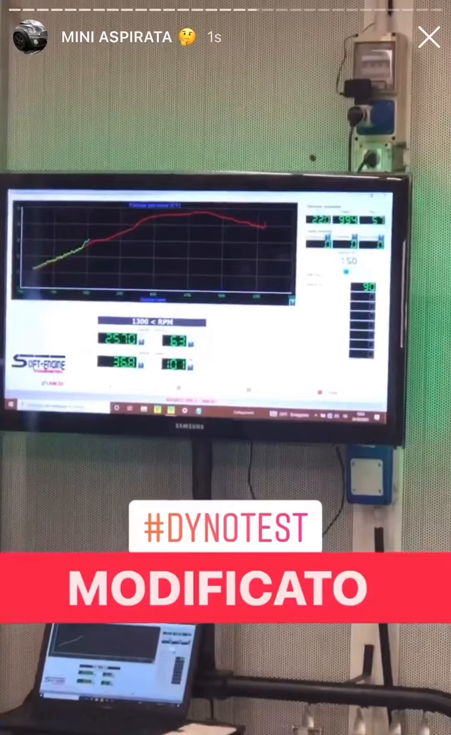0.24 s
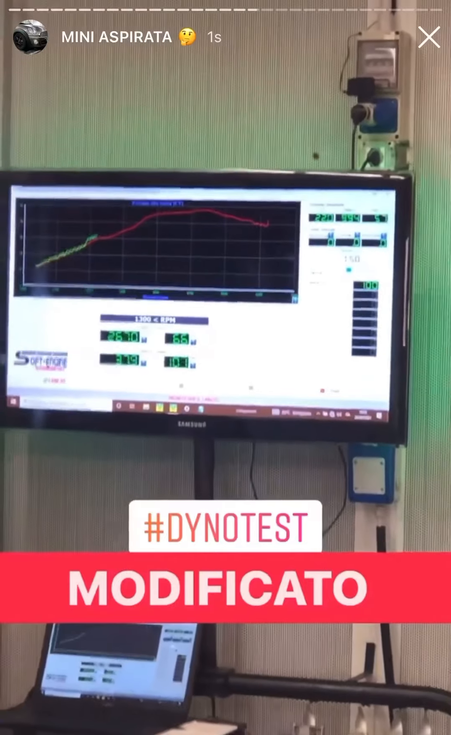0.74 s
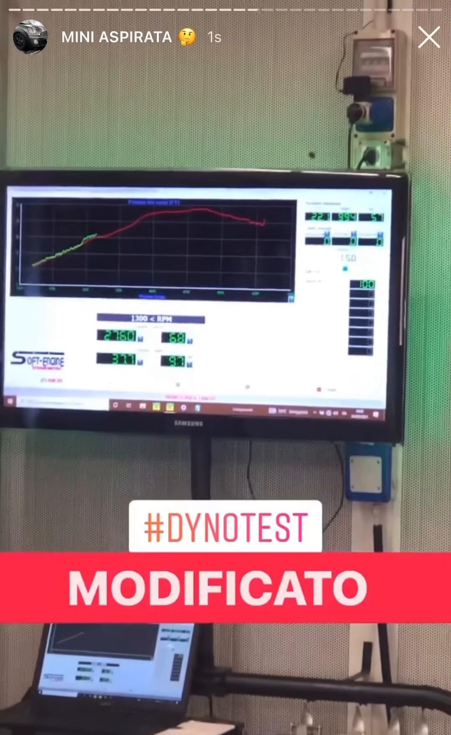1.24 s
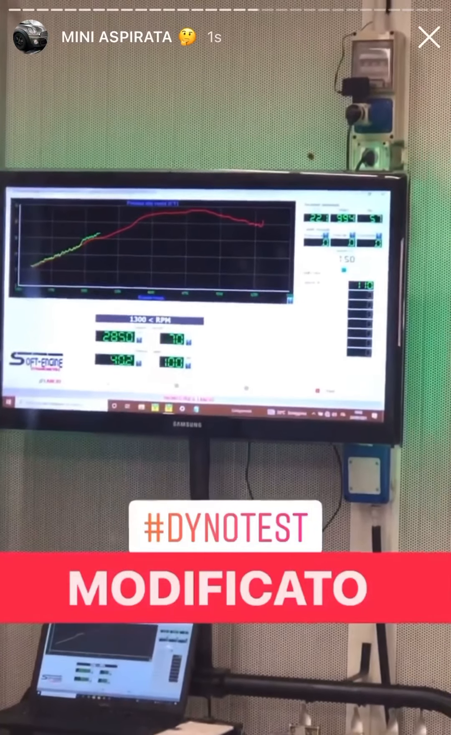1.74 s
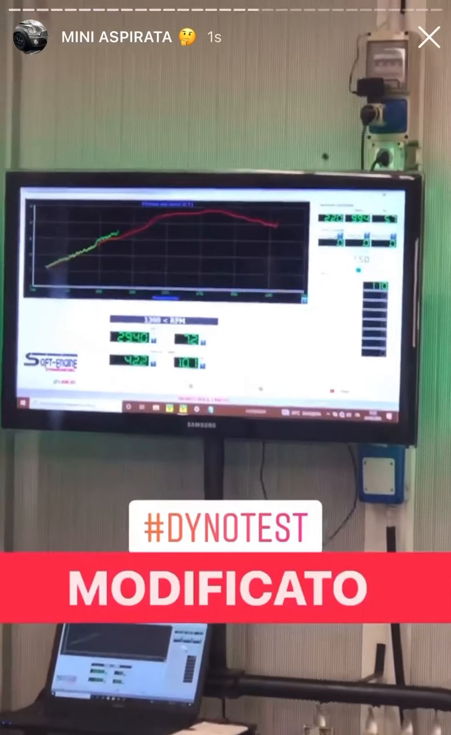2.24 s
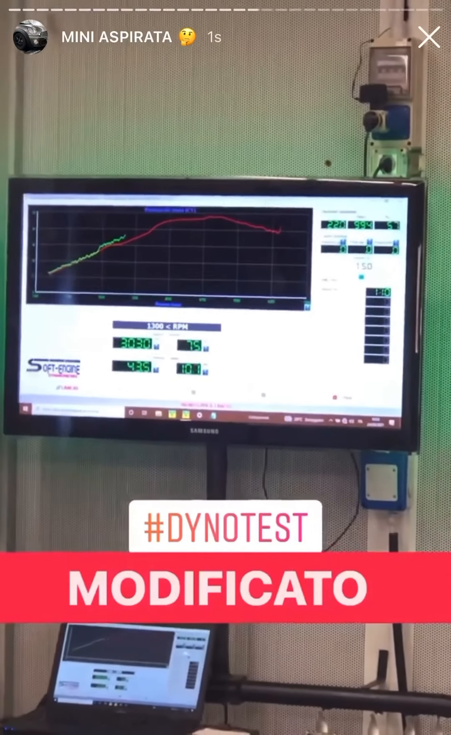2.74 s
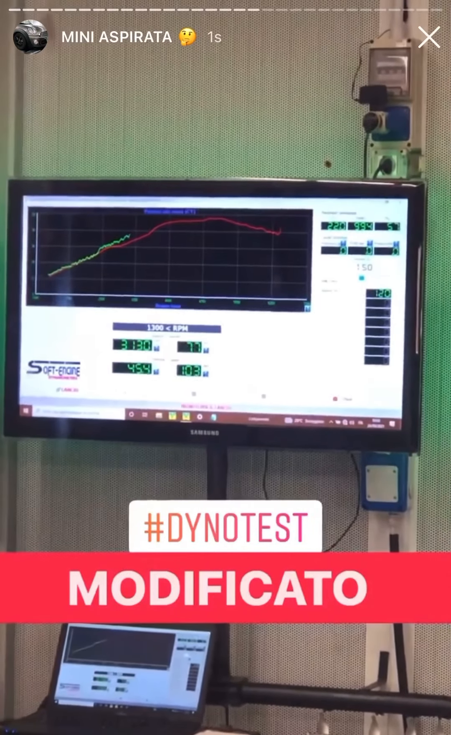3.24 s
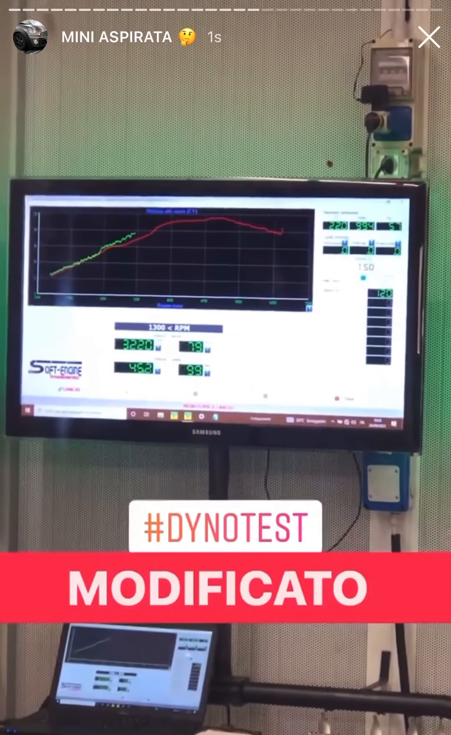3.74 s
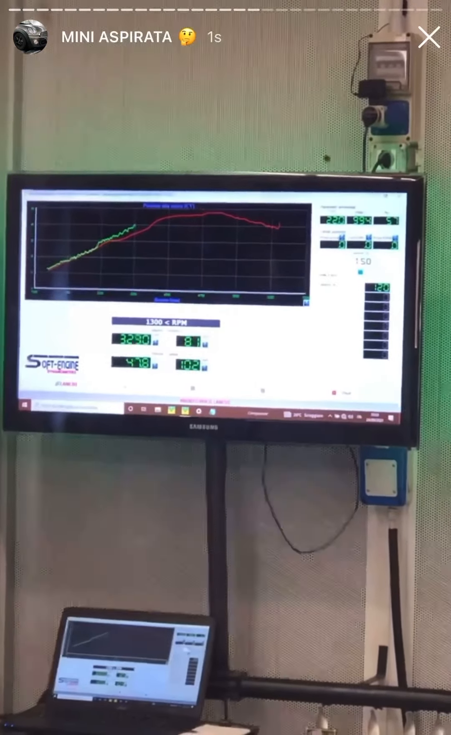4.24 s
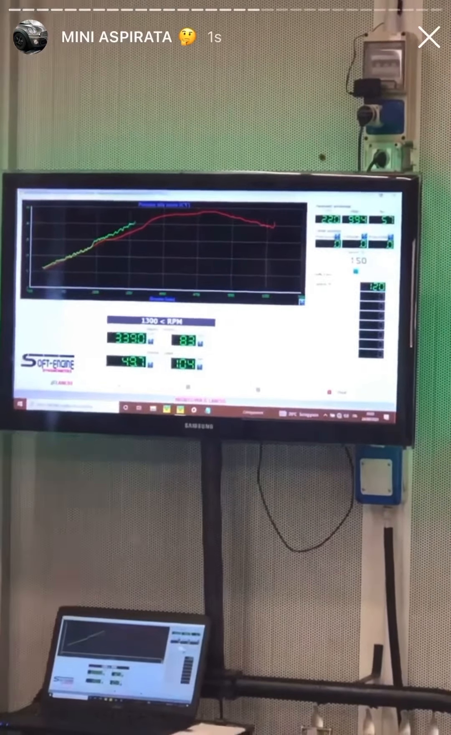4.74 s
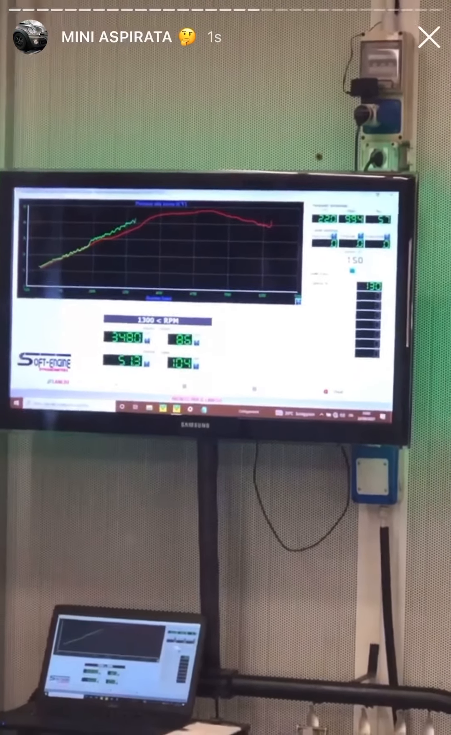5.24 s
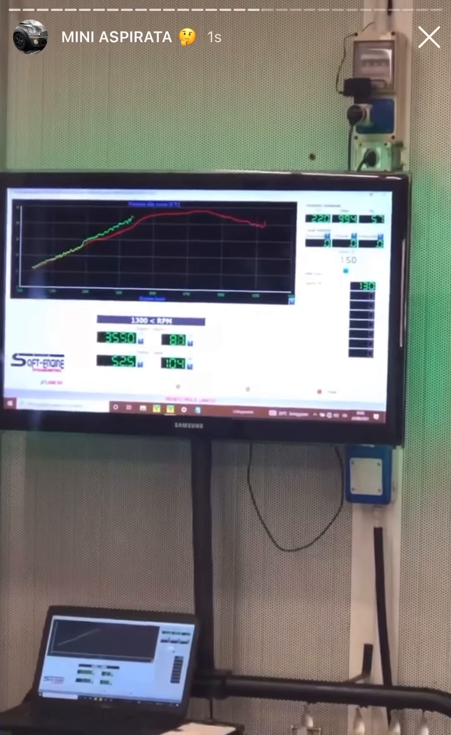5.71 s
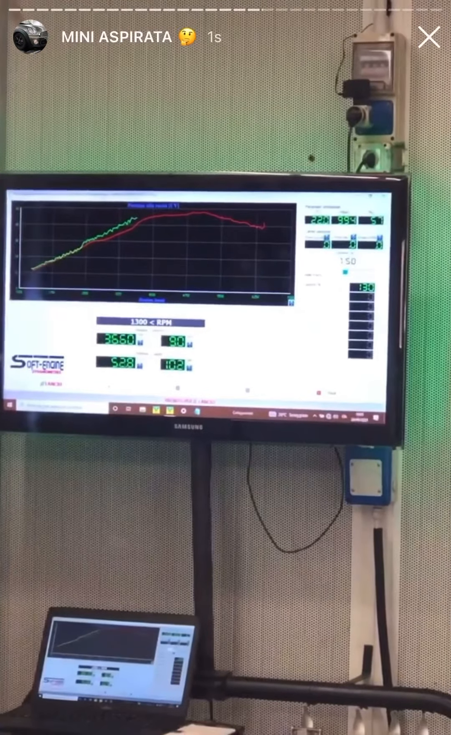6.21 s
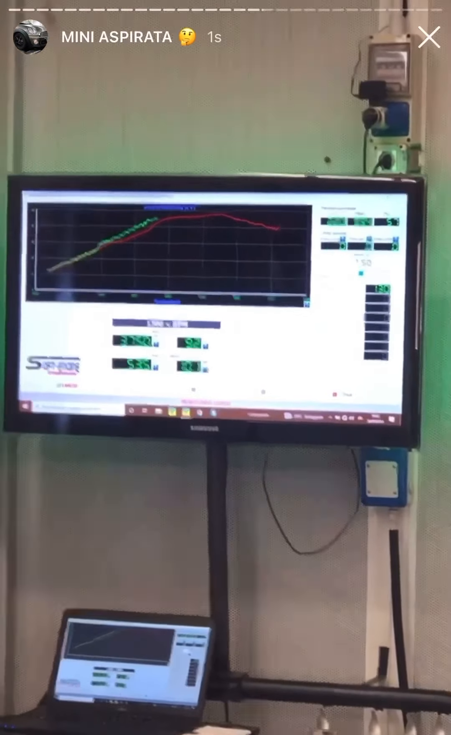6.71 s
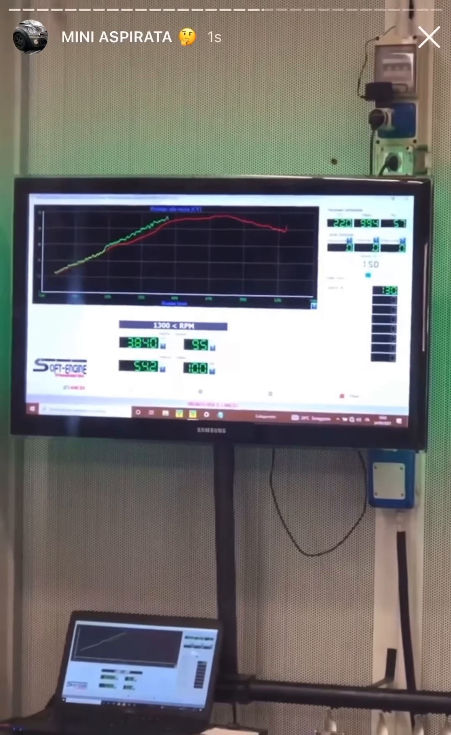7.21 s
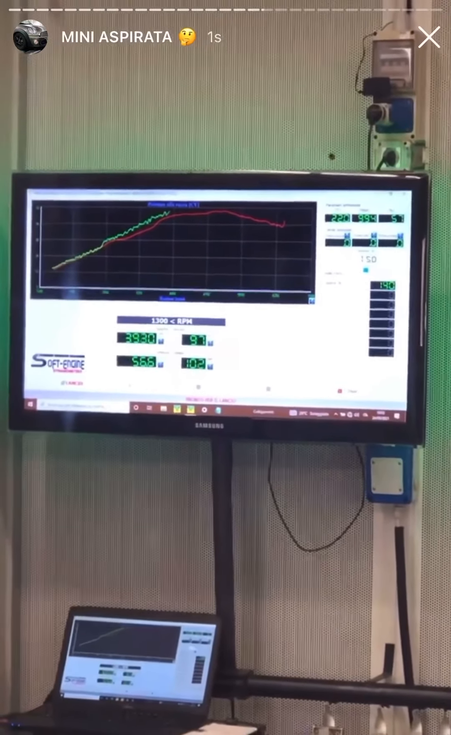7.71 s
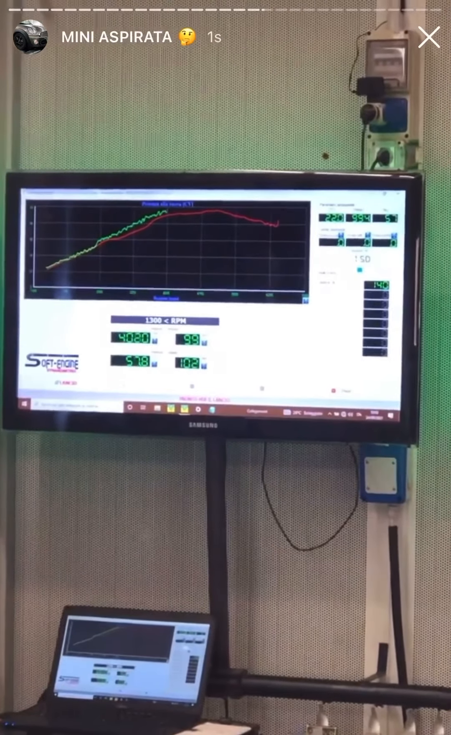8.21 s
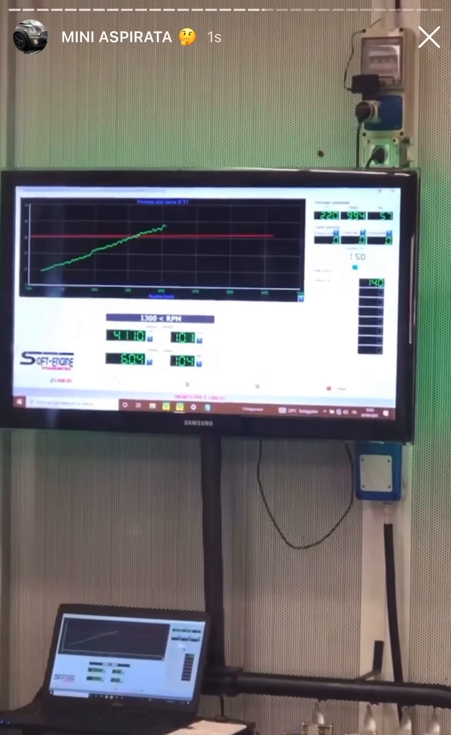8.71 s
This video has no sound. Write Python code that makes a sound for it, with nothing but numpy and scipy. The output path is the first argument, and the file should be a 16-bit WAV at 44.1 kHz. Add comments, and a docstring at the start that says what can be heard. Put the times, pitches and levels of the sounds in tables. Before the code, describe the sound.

Heard from the next room, a four-cylinder petrol engine pulls steadily upward at full throttle on dynamometer rollers. Its deep drone swells and dips through room and pipe resonances, over roller hum, faint gear whine, valve clatter and rushing air. Just before the middle the sound drops to silence for a quarter second, clicking at both edges, then resumes. Late on, the casing rings metallic and the treble grows.

```python
"""A four-cylinder petrol engine climbs at full throttle on a roller dynamometer, heard from the next room.
From the start its firing orders (sines at multiples of the firing rate) slide through fixed resonances,
over roller hum, gear whines, clatter, roaring and buffeting noise and a faint high line near 10.1 kHz.
Near 4 s the sound cuts out dead for a quarter of a second, with a click at each edge.
It returns and climbs on, and in the last seconds the engine casing rings strongly."""
import sys
import numpy as np
from scipy import signal
from scipy.fft import rfft, irfft
from scipy.io import wavfile
from scipy.ndimage import uniform_filter1d

SR = 44100
rng = np.random.default_rng(int(sys.argv[2]) if len(sys.argv) > 2 else 0)


def to_wav(s):
    """Save 16-bit WAV."""
    ch = np.atleast_2d(s).T  # columns
    pcm = np.round(np.clip(ch, -1, 1) * 32767)  # PCM
    wavfile.write(sys.argv[1], SR, pcm.astype(np.int16))


N = 395136  # length in samples
STEP = 256  # samples between control values

# How fast the engine fires. Each row: time in seconds, firings per second in Hz.
FIRING_RATE = [(0.0, 86.14), (0.5, 89.13), (1.0, 92.13), (1.5, 95.35), (2.0, 98.43), (2.5, 101.56),
               (3.0, 104.65), (3.5, 107.69), (3.88, 110.02), (4.15, 111.05), (4.6, 113.72), (5.2, 117.47),
               (5.8, 121.15), (6.4, 124.79), (7.0, 128.31), (7.6, 131.9), (8.2, 135.49), (8.6, 137.75),
               (8.96, 139.85)]


def amp(db):
    """Turn decibels into gain."""
    return 10 ** (np.asarray(db) / 20)


def curve(table, t, axis=1):
    """Read one column of a table, joined by straight lines along its first column."""
    rows = np.array(table)
    return np.interp(t, rows[:, 0], rows[:, axis])


def spread(points, hz):
    """Read a spectrum joined by straight lines on a log-frequency axis."""
    f, value = np.transpose(points)
    return np.interp(np.log(hz + 1), np.log(f + 1), value)


def peaks_db(peaks, hz):
    """Add up bell-like peaks and dips in dB, each with its own frequency and width."""
    return sum(db / (1 + (2 * (hz - f) / width) ** 2) for f, width, db in peaks)


def resonance(hz, f, width, db):
    """Complex response of one resonance, which reaches its dB at its own frequency f."""
    return amp(db) * width / 2 / (width / 2 + 1j * (hz - f))


def drift(t, fastest_hz):
    """Slow random wandering of rms 1, made of 16 sines with random starts."""
    hz = np.geomspace(fastest_hz / 20, fastest_hz, 16)
    start = rng.random(16)
    x = (np.sin(2 * np.pi * (np.outer(t, hz) + start)) / np.sqrt(hz)).sum(1)
    return x / x.std()


def tone(turns, height):
    """A sine following the given turns; its complex height (rms and phase) comes at control rate."""
    at = np.arange(len(turns)) * (N / len(turns) / STEP)
    steps = np.arange(len(height))
    smooth = np.interp(at, steps, height.real) + 1j * np.interp(at, steps, height.imag)
    return np.sqrt(2) * (smooth * np.exp(2j * np.pi * turns)).real


def boom(hz):
    """Gain of the standing waves between tailpipe and walls; their swings add or cancel."""
    # Each row: frequency in Hz, width in Hz, level in dB, sign of the swing.
    standing_waves = [(48, 5.7, -10, 1), (107.66, 16.3, -20, 1), (129.4, 12, -19, -1),
                      (144.2, 5.43, -14, -1), (183.4, 7, -6, 1), (199.4, 28.0, -20.5, -1),
                      (254.5, 13.7, -5.5, 1), (268.4, 32.4, -9.5, -1), (279.74, 5.5, -12, 1),
                      (314.2, 42.2, -24, -1), (322.4, 3.1, -27, 1), (327, 30, -24, 1),
                      (384.1, 17.5, -23.5, 1), (398.8, 6.4, -30.5, 1), (418, 30, -29, -1),
                      (444, 9.9, -33.5, -1), (481.2, 21, -30, -1), (507.7, 15, -30.5, -1),
                      (539, 3.9, -31.5, 1), (571, 9.3, -27, 1), (668, 42, -30.5, -1), (700, 1.0, -39.5, 1),
                      (945, 15, -25.5, 1), (1350, 540, -34.5, -1)]
    return abs(sum(np.sign(swing) * resonance(hz, f, width, db) for f, width, db, swing in standing_waves))


def swell_db(order, t):
    """Bell-shaped swells and dips of one firing order as time passes."""
    # Each row: multiple of the firing rate, centre in seconds, spread in seconds, lift in dB.
    passing_swells = [(5.75, 1, .8, -4.5), (6, 5.3, .4, 5.5), (3, 3.6, 0.32, 5), (6.5, 6, 1.1, 4),
                      (7, 5, .6, 5), (7.75, 4.6, .4, 6.5), (6.75, 7.3, .5, 5), (.5, .4, 0.36, 2),
                      (1.25, 4.3, 0.37, 6.5), (1.5, .7, .3, 5), (1.75, 3.2, .5, 4.5), (2, 0.23, 0.19, -5),
                      (2, 2.1, 0.35, -2.5), (2, 4.4, .9, 4.5), (2.25, 5.8, .4, 6), (3, 3, 0.22, -8),
                      (3, 5.8, .35, 2.5), (3.25, 8.5, 0.36, -7), (4, 4.5, 0.22, 3), (5, 6, .3, 6),
                      (6, 1.6, .6, 7), (7.25, 6.2, .8, 8), (8, 3.2, 0.55, 8.5), (8.25, 5.2, .5, 7),
                      (1.25, 0.21, .4, 6.5), (1.25, 1.6, 0.57, -8.5), (1.5, 7.2, .4, 4.5),
                      (2.25, 0.32, 0.63, 7.5), (2.25, 6.9, 0.3, -2), (2.5, 0.73, 0.35, -15.5),
                      (2.5, 2.22, .4, 7), (2.5, 3.6, 0.28, -7.5), (2.75, .2, 0.29, -2),
                      (2.75, 2.7, 0.62, -2.5), (2.75, 8.8, .3, 10), (3, 2.9, 0.69, 2),
                      (3.25, 0.47, 0.44, -9.5), (3.25, 5.4, .7, 8), (3.5, 1, 0.35, 11),
                      (3.5, 8.3, 0.75, 4.5), (4, .3, 0.42, -4.5), (4, 1.6, 0.33, 5.5),
                      (4, 8.25, 0.1, -11.5), (4.25, 1.2, 0.44, 2), (4.5, 1, .6, -4), (4.75, 0.11, .3, -8),
                      (4.75, 1.1, 0.32, 3.5), (4.75, 6.2, .4, 5.5), (5, 2.7, 0.33, -5.5), (5, 4.8, .5, 4.5),
                      (5.25, .1, 0.33, -10.5), (5.25, 2, .6, 5.5), (5.5, .2, .4, 2.5), (5.75, 4.3, .7, 4),
                      (6, 2.5, 1.1, -2.5), (7, 7.5, 0.54, 9.5), (7.5, 6.1, 0.86, 6), (8, 8, 0.83, 11.5),
                      (9, 3.2, .4, 8)]
    return sum(db * np.exp(-.5 * ((t - centre) / span) ** 2)
               for k, centre, span, db in passing_swells if round(4 * k) == round(4 * order))


def engine(t, turns):
    """Firing orders a quarter apart; the strong whole ones line up into pulses, and all cross the booms."""
    # The clear orders before swells and booms.
    # Each row: multiple of the firing rate, dB in mid climb, dB gained a second.
    clear_orders = [(0.5, -14, 0.5), (0.75, -7, 0.5), (1.0, 5.5, -0.02), (1.25, -18, 0.3),
                    (1.5, -25.5, -1.5), (1.75, -28.5, 2.9), (2.0, -15, 1.5), (2.25, -35.5, 4.5),
                    (2.5, -18.5, 1.77), (2.75, -23, 0.26), (3.0, -10.5, 1.36), (3.25, -19.5, 0),
                    (3.5, -20, 1.46), (3.75, -22, 2.1), (4.0, -7.5, 0.84), (4.25, -14.5, -0.14),
                    (4.5, -15, 0.9), (4.75, -15.5, -1.4), (5.0, -12.5, -1.1), (5.25, -19.5, -2.4),
                    (5.5, -20, -0.2), (5.75, -16.5, -1), (6.0, -25.5, 0.5), (6.25, -20, -2),
                    (6.5, -23.5, -1.5), (6.75, -29, -2.8), (7.0, -21.5, -1)]
    # The fainter orders, joined by lines between the rows and before the lifts below.
    # Each row: multiple of the firing rate, dB in mid climb, dB gained a second.
    faint_orders = [(.25, -17, 3), (7.25, -26.5, -1.1), (8.25, -28.5, -0.7), (11, -44.5, -2.3)]
    mid_s, top_order = 4.5, 11  # middle of the climb in seconds, highest multiple
    whole_db, half_db = 1.5, -1  # lift of faint whole and half multiples
    waver_db, slip = 3.0, .42  # wandering of the faint orders: level in dB, phase in radians at order 1
    turns = turns[::8]  # all orders lie low: a coarse time grid is enough
    rate = curve(FIRING_RATE, t)
    out = 0
    for multiple, db, rise_db in clear_orders:
        order = round(4 * multiple) / 4
        # orders from unequal cylinders waver in level and keep no common phase
        loose = order % 1 > 0
        waver = amp(loose * 1.3 * drift(t, 4))
        phase = .08j * order * drift(t, 6.6) + loose * 2j * np.pi * rng.random()
        level = amp(db + rise_db * (t - mid_s) + swell_db(order, t))
        out += tone(order * turns, level * boom(order * rate) * waver * np.exp(phase))
    quarters = np.arange(1, 4 * top_order + 1) / 4
    for order in np.setdiff1d(quarters, [round(4 * k) / 4 for k, *_ in clear_orders]):
        db = curve(faint_orders, order) + curve(faint_orders, order, axis=2) * (t - mid_s)
        db = db + whole_db * (order % 1 == 0) + half_db * (order % 1 == .5) + swell_db(order, t)
        waver = amp(waver_db * drift(t, 4.7))
        phase = 1j * slip * np.sqrt(order) * drift(t, 6) + 2j * np.pi * rng.random()
        out += tone(order * turns, amp(db) * boom(order * rate) * waver * np.exp(phase))
    return signal.resample_poly(out, 8, 1, window=("kaiser", 14))[:N]


def casing_db(hz):
    """Lift in dB given by the ways the engine casing vibrates."""
    # Each row: frequency in Hz, width in Hz, lift in dB.
    casing_modes = [(1550, 80, 1), (2250, 50, 2), (2725, 40, 13), (3030, 35, 6), (3585, 45, 7)]
    return peaks_db(casing_modes, hz)


def ringing(t):
    """How fully the casing rings, 0-1: faint at first, then it takes off at high speed."""
    takeoff_hz, span_hz, idle = 130.5, 1.5, .2  # firing rate at take-off, its softness, share below it
    return idle + (1 - idle) / (1 + np.exp((takeoff_hz - curve(FIRING_RATE, t)) / span_hz))


def driveline(t, turns):
    """Roller hum, shaft lines and gear whines, all geared to the engine; high lines slip most in phase."""
    # The roller hum swells and fades. Each row: time in seconds, level in dB rms.
    roller_hum = [(0.1, -36.5), (0.8, -21.5), (1.65, -18), (2.25, -35.5), (2.6, -25), (3.1, -15),
                  (3.7, -19.5), (4.7, -28.5), (5.2, -24.5), (5.9, -25.5), (6.4, -44.5), (7.1, -25.5),
                  (7.6, -23), (8.3, -32.5), (8.9, -23)]
    # Wheels, shafts and gear teeth, before waver and casing lift.
    # Each row: multiple of the firing rate, dB rms at the end, dB gained a second.
    shaft_lines = [(.225, -31, 1), (.89, -42, 0), (1.125, -43, -1), (6.6, -54, 1), (13.2, -66, .5),
                   (15.5, -68, .3), (19.5, -73, 1), (19.9, -72, 1), (20.4, -72, 1), (22.85, -73, 1),
                   (23.9, -72, .5), (25.95, -69, 1.5), (26.45, -73, .5)]
    roller_ratio = .337  # roller turns per firing
    out = tone(roller_ratio * turns, amp(curve(roller_hum, t)) + 0j)
    for multiple, db, rise_db in shaft_lines:
        waver = amp(2.2 * drift(t, 4.5))
        slip = np.exp(.4j * np.sqrt(multiple + 4) * drift(t, 8))
        casing_lift = ringing(t) * casing_db(multiple * curve(FIRING_RATE, t))
        level = amp(db + rise_db * (t - t[-1]) + casing_lift)
        out += tone(multiple * turns, level * waver * slip)
    return out


def treble_db(t):
    """Treble lift in dB, which grows steadily through the climb."""
    start_db, rise_db_per_s = -3, .6539
    return start_db + rise_db_per_s * t


def clatter(turns):
    """Valve-train taps: a random pattern returns every four firings, slowly renewed, smeared by the room."""
    # Colour of the taps, relative. Each row: frequency in Hz, level in dB per Hz.
    tap_colour = [(600, -36), (900, 0), (1400, 2), (1900, -7.5), (2500, -17), (3400, -12.5), (4400, -20.5),
                  (5000, -32.5), (7000, -48)]
    level_db = -49  # rms before the treble lift
    even_room = .6  # how far the room's peaks are evened out, 0-1
    t = np.arange(N) / SR
    patterns = rng.standard_normal((15, 512))
    place = (turns / 4 % 1 * 512).astype(int)
    # fade from each pattern to the next at constant power
    age = np.linspace(0, 13.999, N)
    old, fade = age.astype(int), np.pi / 2 * (age % 1)
    taps = np.cos(fade) * patterns[old, place] + np.sin(fade) * patterns[old + 1, place]
    # the room's echo is noise dying by 60 dB in 0.1 s
    echo_t = np.arange(SR // 4) / SR
    echo = rng.standard_normal(SR // 4) * amp(-60 * echo_t / .1)
    hz, room = np.fft.rfftfreq(N, 1 / SR), rfft(echo, N)
    heard = rfft(taps) * room / abs(room) ** even_room * amp(spread(tap_colour, hz))
    plain, rung = irfft(heard, N), irfft(heard * amp(casing_db(hz)), N)
    x = (1 - ringing(t)) * plain + ringing(t) * rung
    return x / x.std() * amp(level_db + treble_db(t))


def pipe(hz):
    """Complex response of exhaust pipe and workshop; neighbouring resonances swing in opposite sign."""
    # Each row: frequency in Hz, width in Hz, level in dB.
    pipe_modes = [(45, 9.2, -12.5), (115.4, 20.9, -13.5), (187.6, 16.1, -8), (257, 19.8, -5.5),
                  (337, 39, -14.5), (381, 21, -13.5), (517, 112, -13), (539, 15.1, -11), (643, 64, -19.5),
                  (883, 29.5, -10), (924, 125, -16), (1280, 550, -27.5)]
    return sum((-1) ** k * resonance(hz, *mode) for k, mode in enumerate(pipe_modes))


def roar(turns):
    """Noise of intake, tyres, fans and buffeting air, partly ringing the pipe and throbbing with the firings."""
    # Basic colour, relative. Each row: frequency in Hz, level in dB per Hz.
    roar_colour = [(4, 0), (9, -3), (13, 4.5), (16, -3), (21, -13), (38, -12), (80, -23.5), (200, -27.5),
                   (350, -34.5), (500, -35), (780, -37.5), (1400, -47), (1900, -53.5), (3400, -60.5),
                   (4500, -67), (5300, -75.5), (11000, -83)]
    # Air buffeting the microphone, under 60 Hz. Each row: time in seconds, lift in dB.
    buffeting = [(0, 1), (.3, 0.5), (.9, -3), (1.6, -0.5), (2, -1.5), (3, 5.5), (3.85, -2.5), (4.2, 2),
                 (4.7, -3.5), (5.3, 1), (6, 1), (6.6, 3), (7, -2.5), (7.8, 0.5), (8.5, -1.5), (8.96, 0)]
    level_db, rise_db_per_s = -21, .2282  # rms at the start before the throb, and its growth
    hiss_top_hz = 13950  # the noise falls by 60 dB above this
    t, hz = np.arange(N // 1024 + 6) * 1024 / SR, np.fft.rfftfreq(4096, 1 / SR)
    real, imag, patches = rng.standard_normal((len(t), len(hz), 3)).T
    # random level patches, smoothed over frequency and then over time
    patches = uniform_filter1d(uniform_filter1d(patches, 28, 0), 3, 1)
    colour = spread(roar_colour, hz)
    colour = colour - 60 * ((hz > hiss_top_hz) | (hz == 0)) - np.maximum(hz - 11000, 0) / 250
    pipe_db = 20 * np.log10(abs(pipe(np.clip(hz, 90, 1100))))
    field = (colour + .77 * (pipe_db + 16))[:, None] + 1.3 * patches / patches.std()
    field += np.outer(hz < 60, curve(buffeting, t))
    # the treble lift comes in from 500 to 1000 Hz and is weaker above 5200 Hz
    treble_share = np.clip(np.log2(hz / 500 + 1e-9), 0, 1) * np.where(hz < 5200, 1, .55)
    field += np.outer(treble_share, treble_db(t))
    field += np.outer(casing_db(hz), ringing(t))
    x = signal.istft((real + 1j * imag) * amp(field), nperseg=4096, noverlap=3072)[1][:N]
    # throb once per firing and once per four firings
    throb = 1 + .016 * np.cos(2 * np.pi * turns) + .057 * np.cos(2 * np.pi * turns / 4)
    return x / x.std() * throb * amp(level_db + rise_db_per_s * np.arange(N) / SR)


def high_line(t):
    """A faint high line near 10.1 kHz, fluttering about 16 times a second and blurred by random phase."""
    # Each row: time in seconds, frequency in Hz, level in dB rms before the flutter.
    high_line_path = [(0, 10155, -84), (.35, 10155, -84), (.45, 10155, -92), (.9, 10153, -82),
                      (1.1, 10152, -93), (1.65, 10150, -84), (1.9, 10149, -90), (2.15, 10148, -85),
                      (3, 10143, -90), (4.5, 10135, -85), (5.3, 10132, -93), (5.9, 10130, -84),
                      (6.3, 10128, -95), (6.8, 10126, -83), (7.4, 10124, -90), (7.9, 10122, -86),
                      (8.3, 10121, -91), (8.96, 10120, -86)]
    flutter_db = 4 * np.sin(2 * np.pi * (16 * t + .5 * drift(t, 3))) + 2.5 * drift(t, 60)
    turns = np.cumsum(curve(high_line_path, np.arange(N) / SR)) / SR
    blur = np.exp(1.3j * drift(t, 60))
    return tone(turns, amp(curve(high_line_path, t, axis=2) + flutter_db) * blur)


def wall(x):
    """The wall between the rooms lets some treble bands through better than others."""
    # Each row: frequency in Hz, width in Hz, lift in dB.
    wall_bands = [(1390, 280, -1.5), (1720, 250, -1.5), (2100, 120, 2), (3300, 200, 0.5), (3730, 150, -2),
                  (3870, 60, 5), (4200, 200, -1.5), (4270, 80, 4)]
    hz = np.fft.rfftfreq(N, 1 / SR)
    return irfft(rfft(x) * amp(peaks_db(wall_bands, hz)), N)


def scene():
    """Engine, driveline, clatter and roar share one speed and pass the wall; the high line is added after."""
    t = np.arange(N // STEP + 2) * STEP / SR
    turns = np.cumsum(curve(FIRING_RATE, np.arange(N) / SR)) / SR  # firings so far
    moving = engine(t, turns) + driveline(t, turns) + clatter(turns) + roar(turns)
    return (wall(moving) + high_line(t))[None]


def record(dry):
    """Cut the sound to silence and back with a click, fade both ends briefly, then limit the treble."""
    # The silent gap: from and to, in seconds.
    dropout = 3.88535, 4.14587
    # Pressure at the two edges of the gap before the treble limit; it sets how hard each clicks.
    click_heights = -.22, -.35
    top_hz = 15500
    t, live = np.arange(N) / SR, dry
    for edge, height in zip(dropout, click_heights):
        # bend the wave so that it meets the edge at the given pressure
        bend = height - dry[:, [round(edge * SR)]]
        live = live + bend * np.exp(-.5 * ((t - edge) / .002) ** 2)
    fades = np.minimum(np.minimum(t / .004, (t[-1] - t) / .001), 1)
    live = live * fades * ((t < dropout[0]) | (t > dropout[1]))
    low_pass = signal.firwin(101, top_hz, window=("kaiser", 9), fs=SR)
    return signal.oaconvolve(live, low_pass[None], "same")


dry = scene()
out = record(dry)
to_wav(out)
```